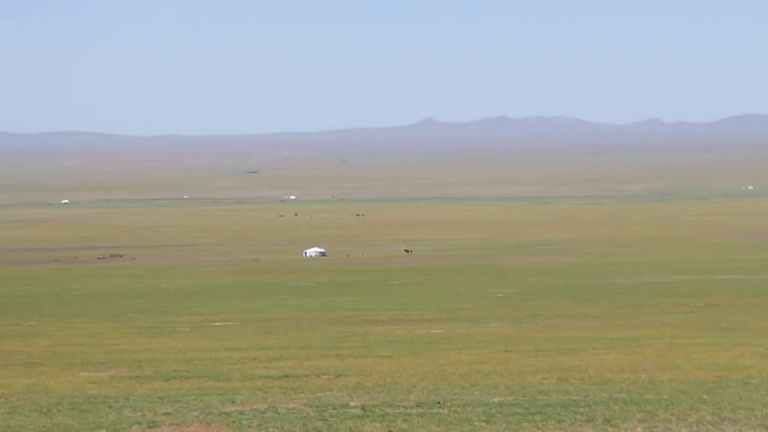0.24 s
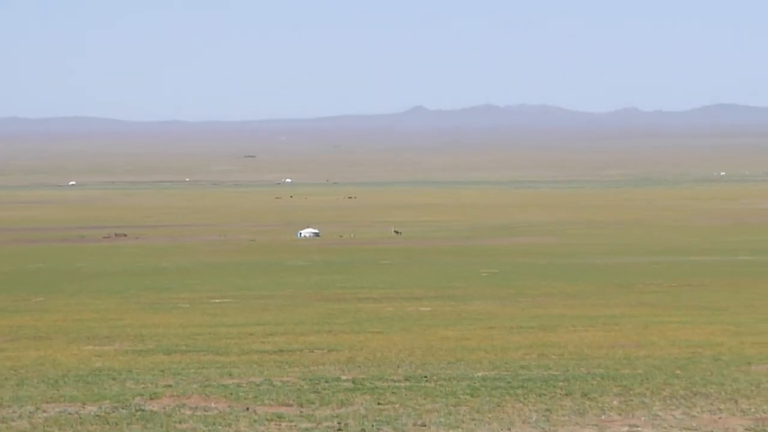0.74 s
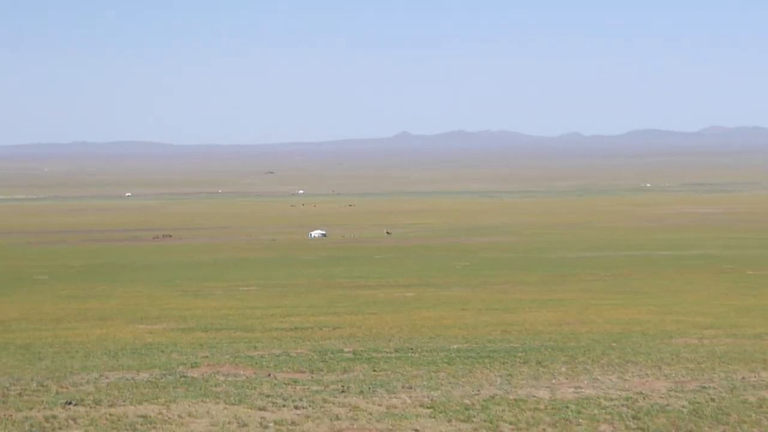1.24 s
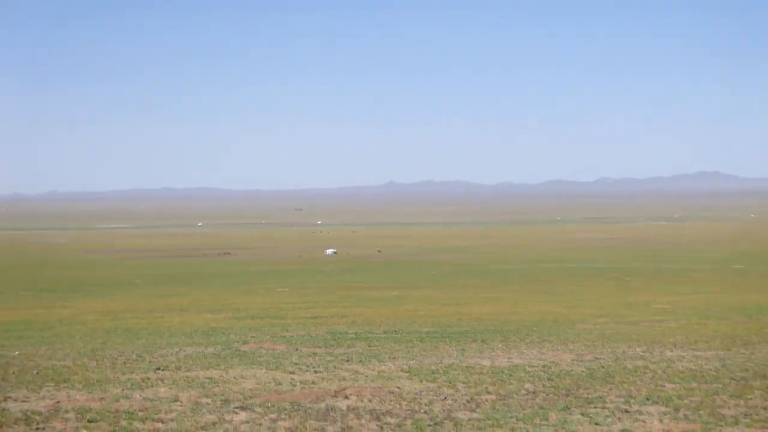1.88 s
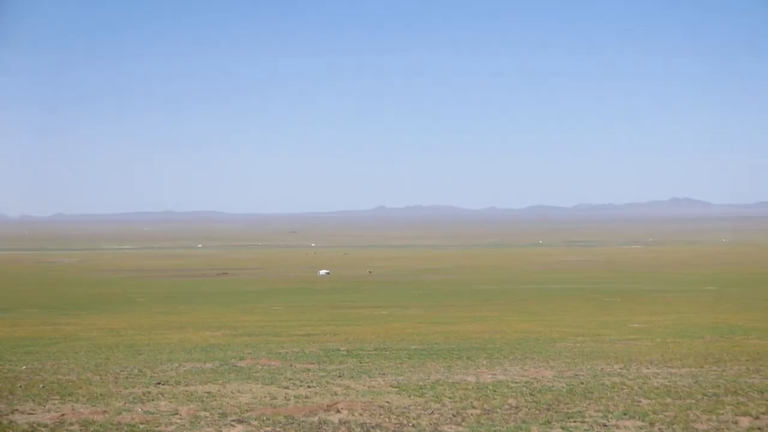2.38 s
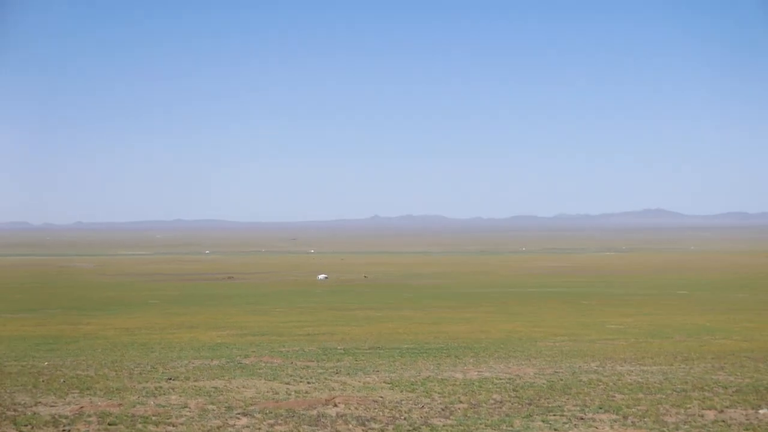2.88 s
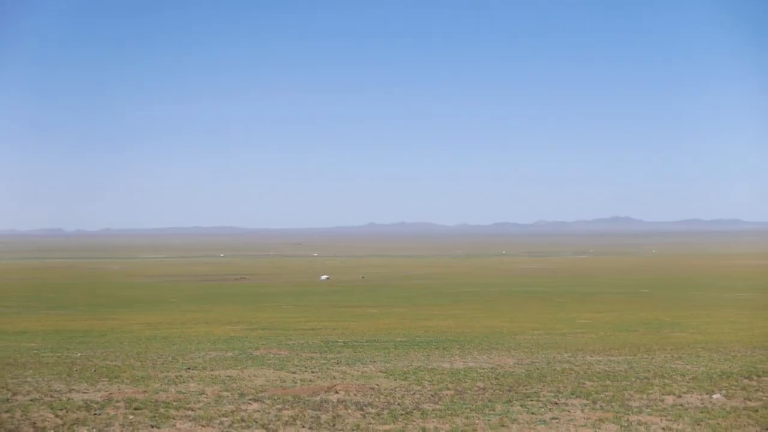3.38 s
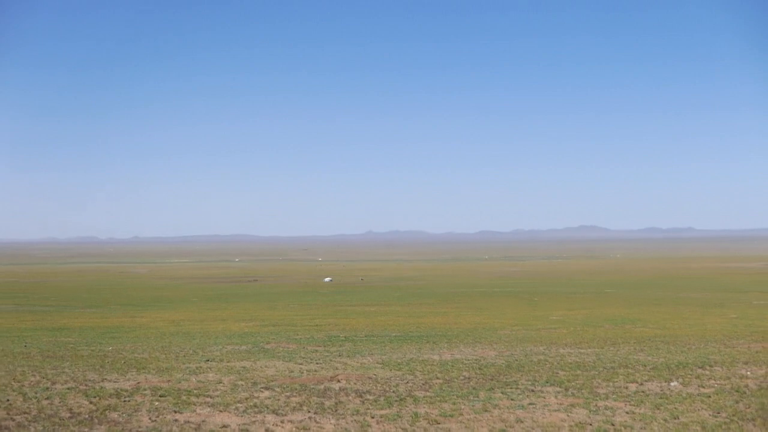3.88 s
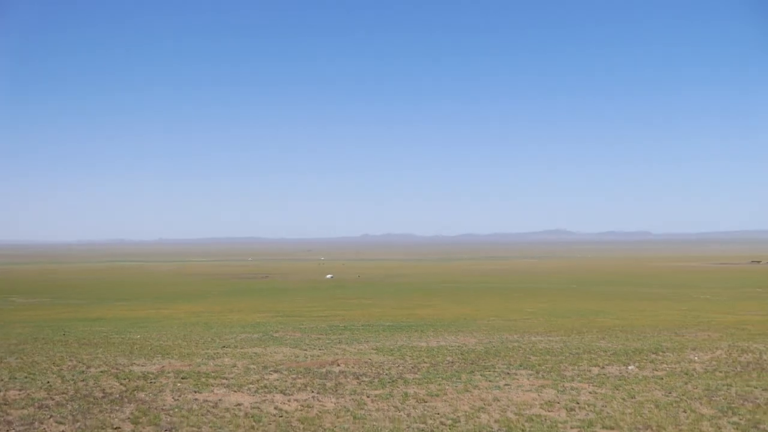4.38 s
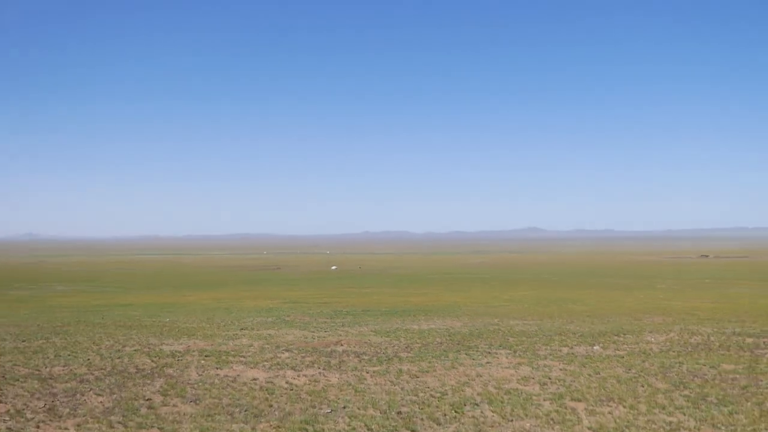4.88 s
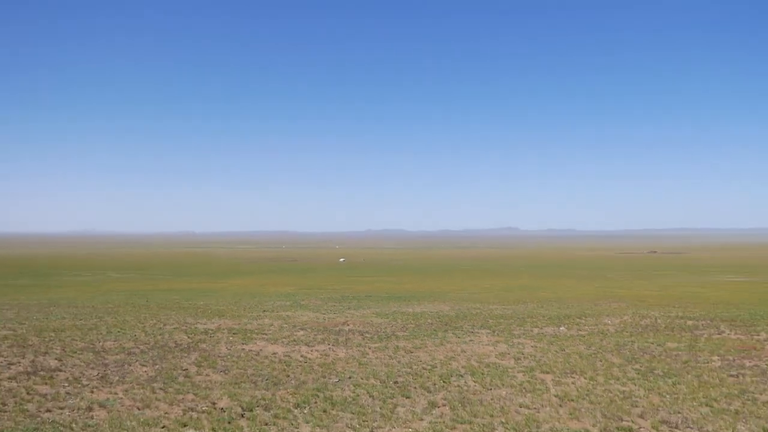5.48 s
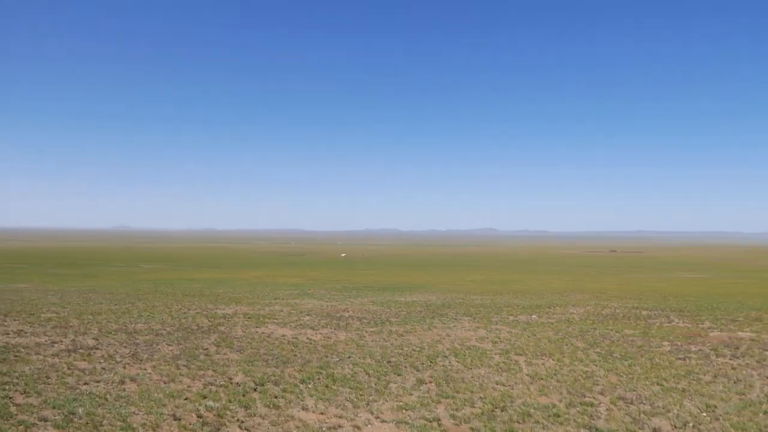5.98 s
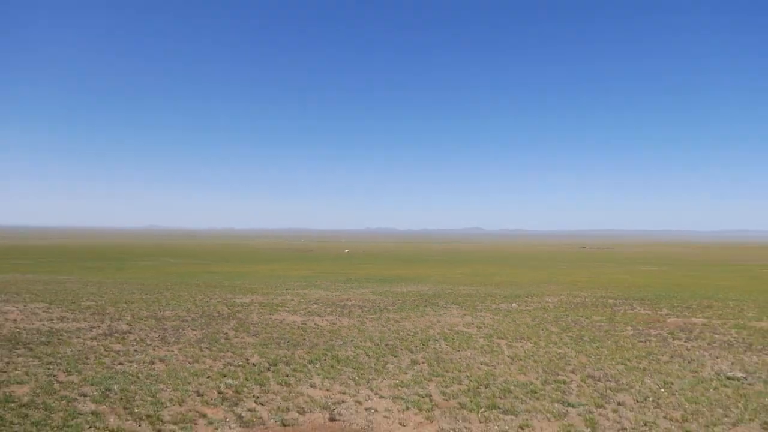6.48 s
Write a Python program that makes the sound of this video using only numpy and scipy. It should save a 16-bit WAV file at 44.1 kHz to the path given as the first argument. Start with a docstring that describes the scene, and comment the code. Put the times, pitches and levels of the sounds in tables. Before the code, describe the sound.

From 0 to 0.27 seconds, wind buffets the microphone ports in rough, low, uneven thumps, strongest around 0.16 to 0.2. A hard cut brings quiet open grassland, and chirping starts immediately, with a loud one at far left near 0.37 and another near 0.58. Each chirp is a tiny pure squeak sweeping up to ten to twelve kilohertz and down within a few hundredths of a second, with a faint hissy fringe and very short scatter from grass. Between about 0.8 and 1.5 the left caller rests and softer right-side and distant chirps carry on. From 1.6 the loud left pulses return about every quarter second until 6.7, interleaved with regular right-hand chirps; another quick caller joins on the left after 5.6. Throughout, a faint mid-pitched lens-motor whirr wavers close by, with small irregular ticks, one clearer at 4.5, over a steady airy hush.

```python
"""Wind thumps the microphone ports in a short first scene on a hilltop; then open grassland, where a colony of
small animals chirps all around a hand-held camera. Eddies, and one dull knock on the housing, are brief
decaying swings over low-frequency noise. The lens motor is a whirr of narrow resonant noise bands with ticks of
decaying noise, beside a steady hush of air. Each chirp is a frequency-modulated sine that arches up and down
within a few hundredths of a second, with a fringe and a faint hiss; the grass adds a short scattered tail."""
import sys
import numpy as np
from scipy import signal
from scipy.fft import rfft, irfft, next_fast_len
from scipy.io import wavfile
from scipy.ndimage import map_coordinates

SR = 44100
rng = np.random.default_rng(int(sys.argv[2]) if len(sys.argv) > 2 else 0)


def wrap_up_sound(samples):
    """Save the sound to the file named by the first command line argument, as 16-bit audio."""
    columns = np.atleast_2d(samples).T
    # keep every value between -1 and 1, then stretch to whole-number steps
    tamed = np.clip(columns, -1, 1)
    steps = np.round(tamed * 32767).astype(np.int16)
    wavfile.write(sys.argv[1], SR, steps)


N = 297389  # length in samples
CUT_S = 0.268  # the hilltop gives way to the grassland

# Low thumps: wind eddies, and one dull knock on the housing at 3.2 s. Each row: start in seconds, nominal level
# in dB, starting frequency in Hz, left-right level in dB.
THUMPS = [(0.017, -32, 168, -7), (0.057, -26, 277, -9.5), (0.07, -26.5, 278, -11), (0.085, -25, 166, -1),
          (0.117, -32.5, 232, 13), (0.163, -22, 390, -3), (0.173, -20, 276, 10), (0.208, -22.5, 196, -3),
          (0.491, -45.5, 108, 3), (0.552, -43, 139, 11), (0.689, -49, 110, 7), (3.2, -46, 340, 0.1),
          (4.352, -53, 110, 5)]
# Motor bands. Each row: nominal centre in Hz, nominal width in Hz, relative level in dB.
MOTOR_BANDS = [(556, 120, -4.5), (1095, 121, 4), (1585, 120, -2), (2195, 117, -9), (2685, 190, -6.5)]
# The motor's effort. Each row: time in seconds, mean level of the whirr in dB.
MOTOR_EFFORT = [(0.0, -61.5), (0.32, -65), (0.64, -62.5), (1.03, -66.5), (1.6, -63), (3.15, -65),
                (3.6, -64.3), (4.47, -66.5), (4.73, -67.5), (5.5, -63.5), (6.14, -65.5), (6.74, -62.5)]
# Gear ticks in the housing. Each row: start in seconds, nominal level in dB.
GEAR_TICKS = [(0.348, -45), (0.48, -46), (0.681, -48), (0.915, -48), (1.115, -47), (1.313, -45),
              (2.165, -45), (2.217, -45), (2.282, -46), (2.516, -46), (2.65, -45), (2.784, -46),
              (3.019, -47), (4.218, -46), (4.237, -48), (4.269, -45), (4.3, -47), (4.338, -49),
              (4.401, -49), (4.502, -42), (4.969, -46), (5.102, -48), (5.237, -48), (5.308, -49.5),
              (5.509, -49.5), (5.633, -48), (5.742, -48), (5.872, -49), (5.937, -49), (6.07, -46),
              (6.669, -45)]
# Spectrum of the air. Each row: frequency in Hz, relative density in dB per Hz.
AIR_SPECTRUM = [(30, -11), (90, -10.5), (240, -5.5), (380, -7.5), (470, -13.5), (720, -8.5), (4500, -21),
                (7900, -20.5), (9800, -17.5), (16000, -29)]
# Correlation of the ports in diffuse noise. Each row: frequency in Hz, left-right correlation from -1 to 1.
PORT_CORRELATION = [(290, 0.43), (560, -0.3), (1400, -0.57), (3000, 0.29)]

# Chirps. Each row: top of the arch in seconds, top frequency in Hz, nominal level in dB, caller,
# and for some the extra length in ms.
CHIRPS = [(0.289, 12500, -55.5, "high"), (0.289, 11600, -53, "far"), (0.317, 11570, -47.5, "right", -1.3),
          (0.3254, 8400, -48, "small"), (0.3723, 12400, -27, "left"), (0.418, 11250, -60, "split"),
          (0.465, 11950, -52, "high"), (0.507, 11410, -56.5, "far"), (0.544, 10060, -46.5, "small"),
          (0.579, 11080, -28.5, "left", 1.9), (0.6235, 11900, -46.5, "right"), (0.641, 12150, -58, "high"),
          (0.7464, 11300, -57.5, "far"), (0.7466, 8600, -47, "small"), (0.787, 10260, -40.5, "left"),
          (0.8158, 11470, -44.5, "right"), (0.8257, 12300, -51.5, "high"), (.957, 11350, -59.5, "far"),
          (1.0018, 9700, -46.5, "small"), (1.011, 11800, -50, "high"), (1.028, 11150, -43.5, "right"),
          (1.171, 11500, -55, "far"), (1.1754, 11900, -55.5, "high"), (1.1931, 12500, -54, "brief"),
          (1.2289, 11030, -44, "right"), (1.249, 10100, -48.5, "small"), (1.3548, 11460, -58, "far"),
          (1.3686, 11600, -54.5, "brief"), (1.4105, 11000, -57, "far"), (1.4262, 11300, -43, "right"),
          (1.5043, 9330, -50, "small"), (1.534, 11950, -60, "brief"), (1.5956, 12450, -31.5, "left", -1.5),
          (1.6176, 11170, -45.5, "right"), (1.679, 11560, -55.5, "high"), (1.7418, 12790, -32.5, "left"),
          (1.8092, 10850, -45, "right"), (1.844, 11500, -54, "brief"), (1.9093, 11100, -58, "far"),
          (1.9327, 12520, -31, "left"), (2.0007, 10950, -44, "right", -1.5), (2.012, 12000, -55, "high"),
          (2.1274, 10860, -50, "small"), (2.1683, 12720, -32.5, "left"), (2.1868, 10900, -42.5, "right"),
          (2.292, 11000, -59.5, "far"), (2.3802, 10700, -42, "right"), (2.432, 11700, -54, "far"),
          (2.4519, 12220, -30, "left", -1.9), (2.523, 11200, -60.5, "far"),
          (2.5939, 10860, -41.5, "right", 1.5), (2.62, 12100, -61, "high"), (2.6511, 12750, -29.5, "left"),
          (2.71, 11100, -59, "far"), (2.714, 10500, -53, "small"), (2.7971, 10880, -42.5, "right"),
          (2.836, 11700, -56, "high"), (2.859, 10300, -60, "brief"), (2.9166, 12690, -28, "left"),
          (2.96, 11330, -60, "far"), (2.9941, 10830, -45, "right", -1.7), (3.038, 11200, -61, "far"),
          (3.1362, 12730, -30, "left"), (3.206, 11500, -58, "high"), (3.245, 11500, -55, "far"),
          (3.327, 11000, -54, "small"), (3.343, 12100, -62, "high"), (3.373, 12380, -30, "left"),
          (3.4298, 11670, -44, "right"), (3.479, 7700, -57, "small"), (3.5044, 11700, -57, "far"),
          (3.54, 10300, -59.5, "brief"), (3.599, 11900, -61, "brief"), (3.621, 12610, -31, "left"),
          (3.6393, 11200, -47, "right", 2.1), (3.6968, 12130, -56, "high"), (3.701, 11500, -56, "far"),
          (3.8259, 12600, -32, "left", 3.4), (3.8765, 11530, -44, "right", -1.8),
          (3.9208, 11500, -56.5, "far"), (4.0181, 9740, -34.5, "left"), (4.0765, 11160, -51, "far"),
          (4.0938, 11500, -43, "right", -2.5), (4.2035, 12380, -32.5, "left", 2.5),
          (4.2943, 11550, -54.5, "far"), (4.3326, 11220, -42.5, "right"), (4.4356, 12500, -34, "left", 2.8),
          (4.5165, 11670, -55, "high"), (4.5426, 11450, -46, "right"), (4.704, 12400, -33, "left"),
          (4.7527, 11570, -42.5, "right", -2.3), (4.8054, 10930, -58, "far"), (4.839, 9600, -59.5, "brief"),
          (4.9304, 12170, -48, "high"), (4.965, 11530, -41.5, "right"), (5.0054, 10940, -31, "left"),
          (5.058, 11100, -59.5, "far"), (5.103, 11600, -59.5, "brief"), (5.1337, 12100, -49.5, "high"),
          (5.1993, 10830, -39, "right"), (5.202, 11810, -34.5, "left"), (5.309, 10900, -55, "brief"),
          (5.3184, 11250, -59.5, "far"), (5.3985, 11030, -41.5, "right"), (5.4082, 12250, -31, "left"),
          (5.494, 12060, -50.5, "high"), (5.5869, 12200, -47.5, "quick"), (5.6393, 11140, -40, "right"),
          (5.755, 12600, -34, "left", 1.7), (5.847, 10920, -54, "far"), (5.9047, 11330, -42.5, "right"),
          (5.9654, 8950, -33, "left"), (5.968, 11620, -41, "quick"), (6.0615, 10900, -55.5, "far"),
          (6.099, 10900, -41, "right", 1.9), (6.1234, 12560, -35.5, "left", 3.2),
          (6.1657, 11020, -41.5, "quick"), (6.1984, 12000, -53, "high"),
          (6.3058, 10960, -38.5, "right", -2.2), (6.327, 12100, -37.5, "left"),
          (6.364, 11500, -43.5, "quick"), (6.4574, 11300, -54, "brief"), (6.4993, 11200, -40, "right"),
          (6.5545, 12200, -40, "quick"), (6.5704, 12390, -36.5, "left"), (6.6965, 11170, -40.5, "right")]
# Callers by name. Each row: chirp length in ms at LOW_HZ, growth in ms per kHz squared away from LOW_HZ,
# share of the length spent rising, and place as (time in seconds, left-right level in dB) while the camera turns.
CALLERS = {"left": (10, 1.08, .37, [(.3, 44), (2.7, 28), (3.15, 24), (3.9, 16), (4.4, 14), (5.5, 20),
           (6.7, 10)]), "right": (24.5, 1.01, .42, [(.3, -0.5), (.8, -5), (1.4, -5.5), (2.9, -5.5),
           (4.5, -12), (5.3, -7), (6.3, -19)]), "small": (16, 0.55, .43, [(.3, 5.6), (2.7, 9.1)]),
           "quick": (9.9, 0.85, .5, [(5.5, 22), (6.6, 13)]), "high": (17, 0.71, .33, [(.3, -9.5), (6, -3)]),
           "far": (20, 1, 0.48, [(.3, -13), (3, -23), (4.5, -9.5), (6, -7)]),
           "split": (29, .51, .06, [(.4, 12)]), "brief": (9.1, 0.67, 0.58, [(1, -6.5), (6, -5)])}
# Housing colour for a caller far to the left. Each row: centre in Hz, width in Hz, gain in dB.
HOUSING_SHADOW = [(9250, 250, 5.5), (10700, 700, -9)]
# Microphone colour for chirps. Each row: frequency in Hz, left gain in dB, right gain in dB.
PORT_COLOUR = [(5470, -10.5, -3), (5910, -12.5, -8.5), (7770, -6, -10), (8680, 0.5, 2), (8740, -3, -2),
               (10700, 0, -1.5), (11550, -1, -1.5), (12300, -8.5, 2.5), (18000, 4.5, -2.5)]
# Callers with a subharmonic. Each entry: caller, level of the octave below relative to the voice in dB.
OCTAVE_BELOW_DB = {"split": 5.5}

SHADOW_FROM_DB = 8.5  # left-right level beyond which a caller counts as far left
LOW_HZ, FOOT_HZ = 8500, 6500  # reference pitch for chirp length; pitch at the nominal ends of the arch
ROUND_UP, ROUND_DOWN = 0.289, 0.48  # share of the rise and of the fall that is a plain parabola
HALF_WINDOW = 1764  # samples each side of a chirp's top: 40 ms
FRINGE_MS, LEAD_DB, TRAIL_DB = 4.6, -11.5, -7.5  # widening of the fringe; nominal far-left levels
HISS_BAND = signal.butter(1, [3500, 15500], "band", fs=SR)
TOP_HZ = 15900  # band limit of the camera


def amp(db):
    """Decibel law: the amplitude gain of a level in dB."""
    return 10 ** (np.asarray(db) / 20)


def unit(x):
    """Normalization: x scaled to rms 1."""
    return x / np.sqrt(np.mean(x ** 2) + 1e-20)


def along(points, hz, axis=1):
    """Logarithmic pitch scale: one column of (Hz, value, ..) points interpolated over log frequency."""
    cols = np.transpose(points)
    return np.interp(np.log(hz + 1), np.log(cols[0] + 1), cols[axis])


def wobble(rate, size=N):
    """Slow random modulation: a smooth curve through rate random knots a second."""
    knots = rng.standard_normal(int(size * rate / SR) + 4)
    return map_coordinates(knots, [np.arange(size) * rate / SR])


def filtered(x, response):
    """Linear filtering: the spectrum of x multiplied by a response of frequency."""
    m = next_fast_len(N + 8192)
    return irfft(rfft(x, m) * response(np.fft.rfftfreq(m, 1 / SR)), m)[..., :N]


def add(track, s, sound):
    """Superposition: mixes a stereo sound into the track at s seconds."""
    part = track[:, max(round(s * SR), 0):][:, :sound.shape[1]]
    part += sound[:, :part.shape[1]]


def diffuse_noise(gain):
    """Partial correlation: shared and opposed noise, mixed by frequency, give stereo noise of rms 1."""
    def mid_side_gain(hz):
        angle = np.arccos(np.clip(along(PORT_CORRELATION, hz), -1, 1)) / 2
        return gain(hz) * np.array([np.cos(angle), np.sin(angle)])

    mid, side = filtered(rng.standard_normal((2, N)), mid_side_gain)
    return unit(np.array([mid + side, mid - side]))


def wind():
    """Turbulence: eddies push the membranes for a few uneven cycles over a flutter, differently at each port; a
    knock on the housing sounds as one more such swing."""
    thumps, t = np.zeros((2, N)), np.arange(SR // 20) / SR
    for s, db, hz, pan_db in THUMPS:
        swing = np.sin(2 * np.pi * hz * t * (1 - 3 * t) + rng.normal(0, 0.4, (2, 1)))
        envelope = (t * hz / 1.22) ** 2 * np.exp(2 - t * hz / 0.48)
        sides = amp(db + np.array([[pan_db], [-pan_db]]) / 2)
        add(thumps, s, sides * envelope * swing)
    flutter = unit(filtered(rng.standard_normal((2, N)), lambda f: f * f / (1 + (f / 170) ** 5)))
    gust_s = [0, 0.02, CUT_S - 0.02, CUT_S, 0.5, 0.7, 1.1]
    gust_db = np.interp(np.arange(N) / SR, gust_s, [-52.5, -48, -44, -68, -70, -66, -96])
    gusts = amp(gust_db + 2.5 * wobble(30)) * flutter
    return filtered(thumps + gusts, lambda f: f ** 4 / (f ** 4 + 55 ** 4))  # high-pass at the ports


def whirr():
    """Resonance: noise in roughly evenly spaced narrow bands wavers, and shifts in pitch with the motor's speed."""
    def band(centre, width):
        return diffuse_noise(lambda f: (f * width / np.hypot(centre * centre - f * f, f * width)) ** 2)

    # Each band wavers on its own.
    bands = unit(sum(amp(db + 1.6 * wobble(6)) * band(hz, width) for hz, width, db in MOTOR_BANDS))
    # The speed wanders, and all bands with it.
    turned = np.clip(np.cumsum(1 + 0.025 * wobble(5)), 0, N - 1)
    bands = np.array([map_coordinates(side, [turned]) for side in bands])
    effort_db = np.interp(np.arange(N) / SR, *np.transpose(MOTOR_EFFORT))
    return amp(effort_db + 2.5 * wobble(30)) * bands


def gear_ticks():
    """Impulse response: each small tick is a decaying burst of noise, coloured by the housing that carries it."""
    ticks, t = np.zeros((2, N)), np.arange(SR // 20) / SR
    # Fainter ticks fall at random times after the hilltop.
    small = [(CUT_S + a * N / SR, -59.5 + 6 * b) for a, b in rng.random((70, 2))]
    for s, db in [*GEAR_TICKS, *small]:
        rattle = rng.standard_normal(len(t)) + 0.55 * rng.standard_normal((2, len(t)))  # partly shared
        upper_hz = 950 * 2 ** rng.normal(0, 0.45)  # some dull, some bright
        housing = signal.butter(1, [250, upper_hz], "band", fs=SR)
        rattle = signal.lfilter(*housing, amp(-60 * t / 0.05) * rattle)
        add(ticks, s, amp(db - 1.8) * rattle / abs(rattle.mean(0)).max())
    return ticks


def air():
    """Diffuse field: the steady hush of the open land is partly correlated noise with a shaped spectrum."""
    return amp(-62.5) * diffuse_noise(lambda hz: amp(along(AIR_SPECTRUM, hz)))


def chirp(top_hz, rise_ms, fall_ms, db, pan_db, octave_below_db):
    """Frequency modulation: a sine follows an arch of pitch, with a fringe and a faint hiss."""
    ms = 1000 * np.arange(-HALF_WINDOW, HALF_WINDOW) / SR
    power = min(1 + (rise_ms + fall_ms) / 9.96, 4.2)  # short chirps are pointed, long ones flat-topped
    roundness = np.where(ms < 0, ROUND_UP, ROUND_DOWN)

    def way_from_top(ms):  # 0 at the top, 1 at either foot
        return np.where(ms < 0, -ms / rise_ms, ms / fall_ms)

    def arch(way):
        drop = roundness * way ** 2 + (1 - roundness) * way ** power
        return np.maximum(top_hz - (top_hz - FOOT_HZ) * drop, 0)

    way = way_from_top(ms)
    hz = arch(way)
    waver = amp(1.7 * wobble(400, size=len(ms)) - 0.6)
    strength = np.clip(hz / 4000 - 1.12, 0, 1) ** 1.25 * waver
    phase = 2 * np.pi * np.cumsum(hz) / SR
    # Around the housing the nearer port leads, more so at high pitch; below 7200 Hz the lead reverses.
    phase = phase + np.tanh(pan_db / 6) * (hz - 7200) / 4500 * np.array([[1], [-1]])

    far_left = pan_db > SHADOW_FROM_DB
    shadow_db = far_left * sum(gain * np.exp(-((hz - c) / w) ** 2) for c, w, gain in HOUSING_SHADOW)
    # The octave below sounds only after the top and fades before the foot.
    octave_below = amp(octave_below_db) * np.clip(4 - 5 * way, 0, 1) * (ms > 0) * np.sin(phase / 2)
    voice = strength * amp(shadow_db) * (np.sin(phase) + octave_below)
    overtone = amp(-17) * (hz < SR / 4) * np.clip(hz / 3000 - 1.1, 0, 1) * np.sin(2 * phase)

    # A fainter, rougher sweep on a wider arch leads the rise and trails the fall, most from the far left.
    wide_hz = arch(way_from_top(np.sign(ms) * np.maximum(abs(ms) - FRINGE_MS, 0)))
    wide_phase = 2 * np.pi * np.cumsum(wide_hz) / SR
    fringe_db = np.where(ms < 0, LEAD_DB, TRAIL_DB) - 6 * (pan_db < SHADOW_FROM_DB)
    fringe_db = fringe_db + 3.5 * wobble(1200, size=len(ms))
    fringe = amp(fringe_db) * np.exp(-((wide_hz - 9200) / 1500) ** 2) * np.sin(wide_phase)
    low_part = abs(wide_hz - 6500) < 2000
    fringe = fringe + amp(fringe_db - 14) * low_part * (np.sin(wide_phase) + np.sin(2 * wide_phase))

    hiss_gain = amp(-26 + 6 * np.minimum(way, 1)) * np.exp(-(way / 1.5) ** 6)
    hiss = hiss_gain * signal.lfilter(*HISS_BAND, rng.standard_normal(phase.shape))
    sides = amp(db + 7 + np.minimum([[pan_db], [-pan_db]], 0))  # the farther port is softer
    return sides * (voice + overtone + fringe + hiss)


def call(s, top_hz, db, caller, extra_ms=0):
    """Pitch-dependent duration: a caller's chirp lasts longer the farther its top lies from LOW_HZ."""
    short_ms, growth_ms, rising, place = CALLERS[caller]
    length_ms = short_ms + growth_ms * ((top_hz - LOW_HZ) / 1000) ** 2 + extra_ms
    pan_db = np.interp(s, *np.transpose(place))
    octave_below_db = OCTAVE_BELOW_DB.get(caller, -np.inf)
    return chirp(top_hz, rising * length_ms, (1 - rising) * length_ms, db, pan_db, octave_below_db)


def scattered(direct):
    """Scattering: grass stems return many small echoes, a noise tail that falls 60 dB in 45 ms."""
    t = np.arange(SR // 5) / SR
    grass = np.zeros((2, N))
    for start in range(0, N, 8192):  # a fresh tail each block, for callers among other stems
        tail = rng.standard_normal((2, len(t))) * amp(-60 * t / 0.045)
        piece = direct[:, start:start + 8192].sum(0, keepdims=True)
        add(grass, start / SR, signal.fftconvolve(piece, tail / np.linalg.norm(tail[0]), axes=1))
    return grass


def colony():
    """Superposition: direct chirps and their scatter add up, then take on the colour of each port."""
    direct = np.zeros((2, N))
    for row in CHIRPS:
        add(direct, row[0] - HALF_WINDOW / SR, call(*row))
    heard = direct + amp(-13) * scattered(direct)
    return filtered(heard, lambda hz: amp([along(PORT_COLOUR, hz, axis=side) for side in (1, 2)]))


def scene():
    """Superposition: all sources add at the two ports; motor and air are softer on the hilltop."""
    hill_db = -4 * (np.arange(N) / SR < CUT_S)
    return wind() + amp(hill_db) * (whirr() + gear_ticks() + air()) + colony()


def record(dry):
    """Band limiting: the camera weakens the deep bass and keeps nothing above its band limit."""
    return filtered(dry, lambda hz: (hz < TOP_HZ) * (0.27 + hz ** 2 / (hz ** 2 + 110 ** 2)))


dry = scene()
out = record(dry)
wrap_up_sound(out)
```